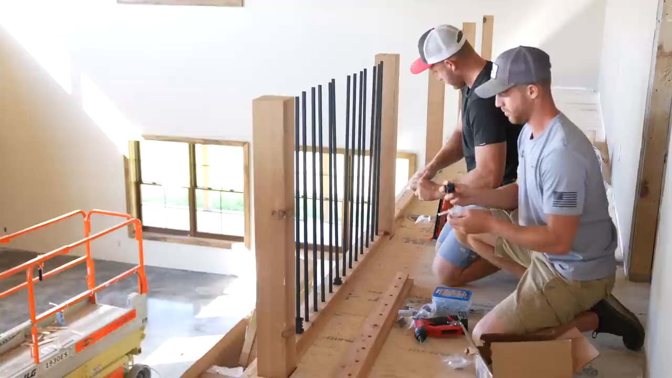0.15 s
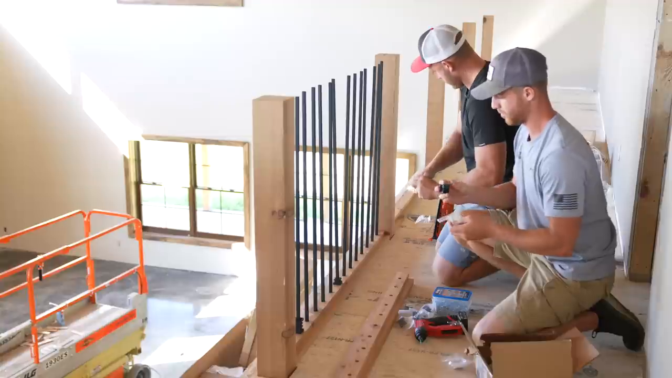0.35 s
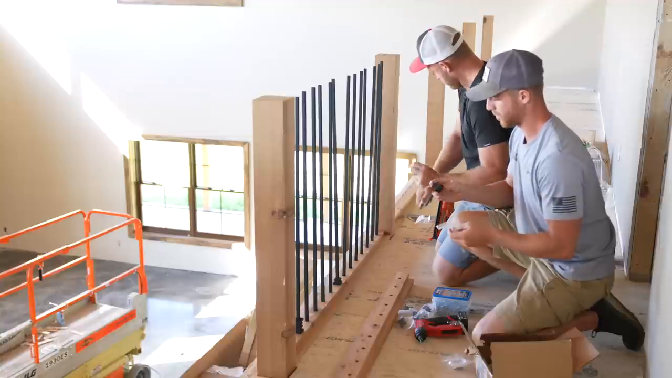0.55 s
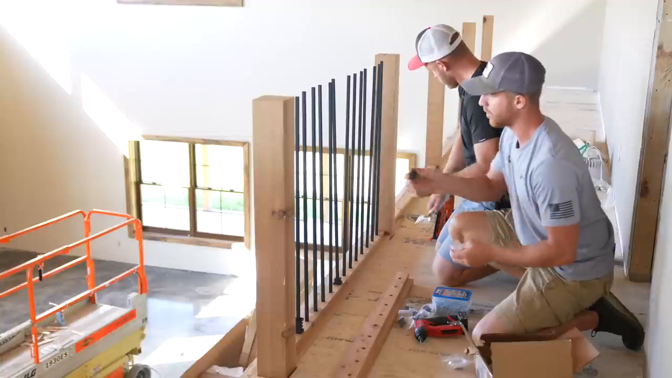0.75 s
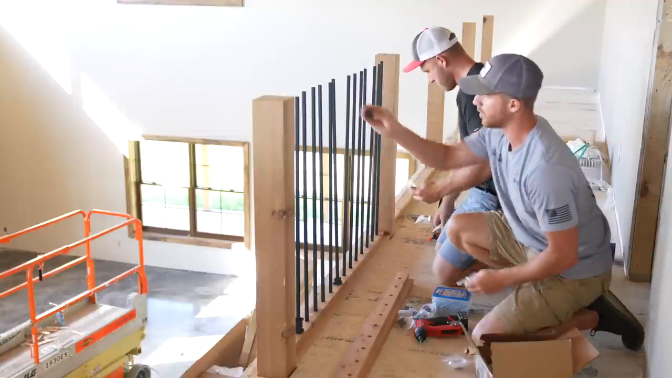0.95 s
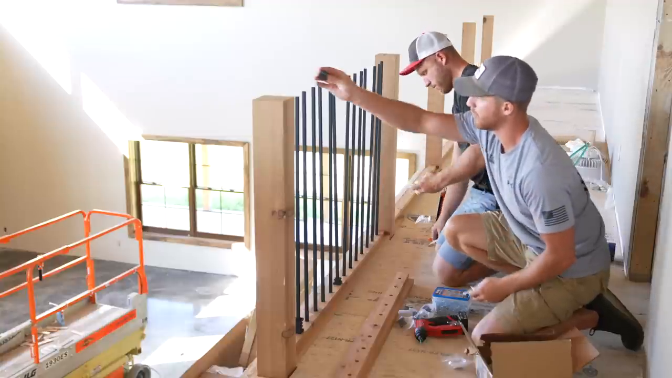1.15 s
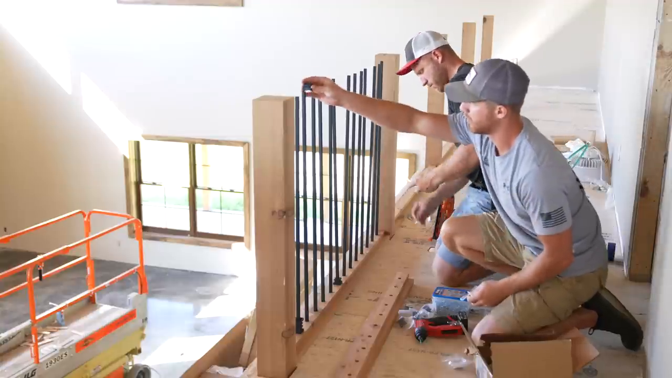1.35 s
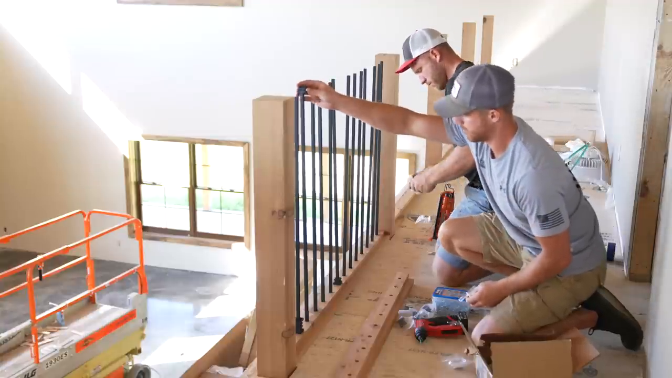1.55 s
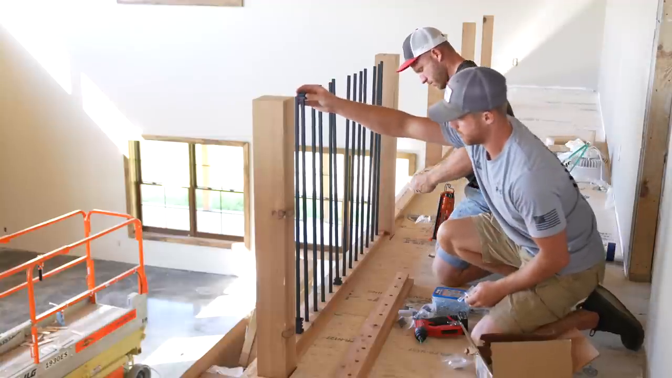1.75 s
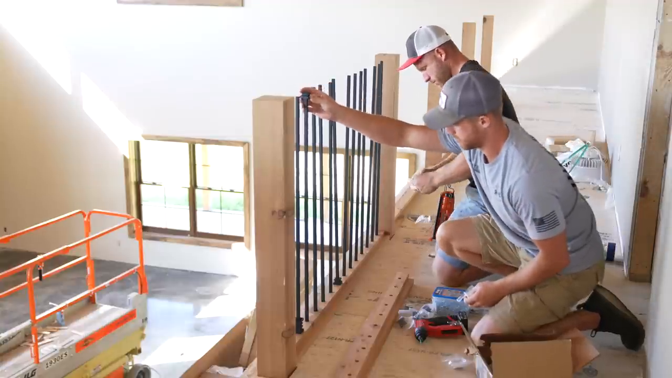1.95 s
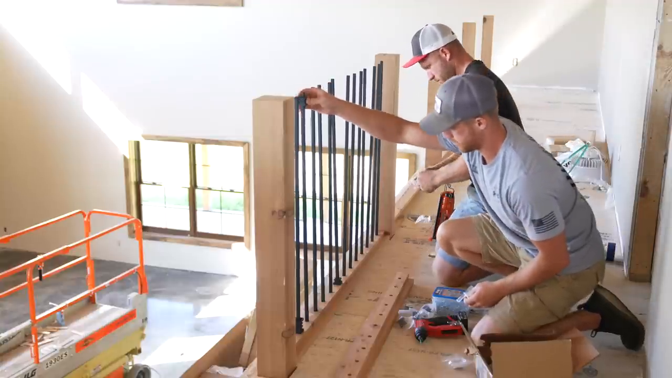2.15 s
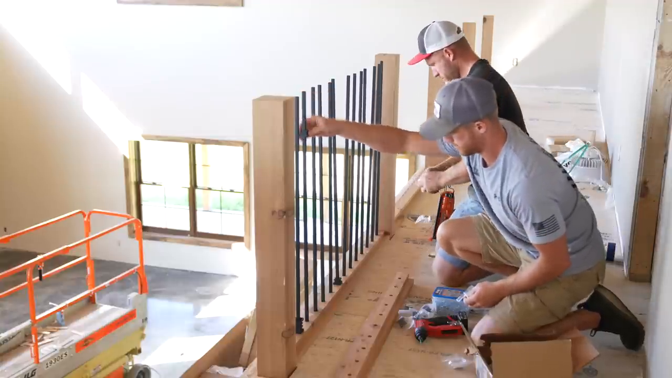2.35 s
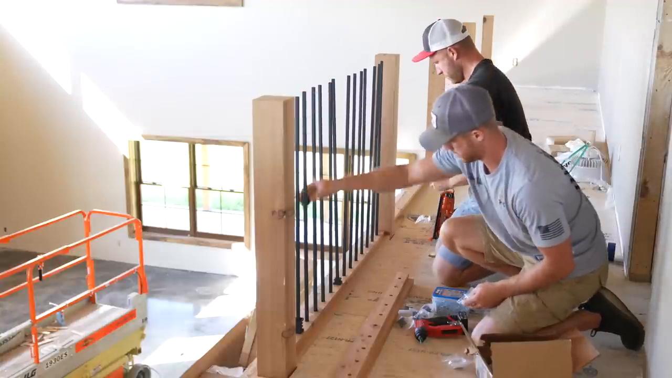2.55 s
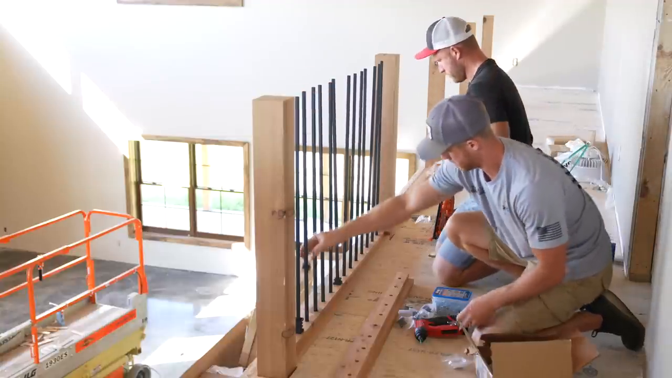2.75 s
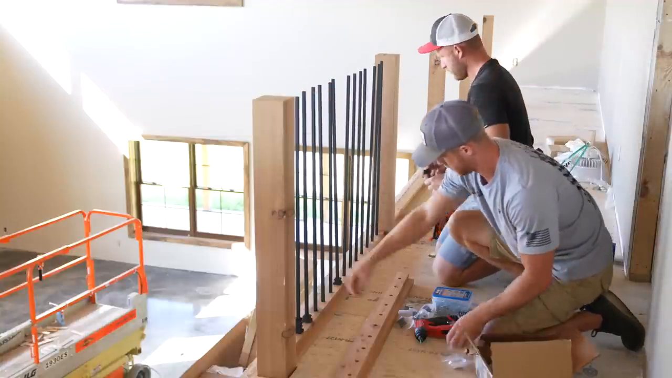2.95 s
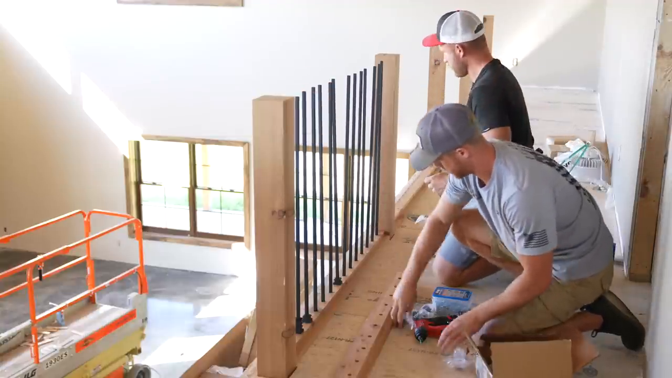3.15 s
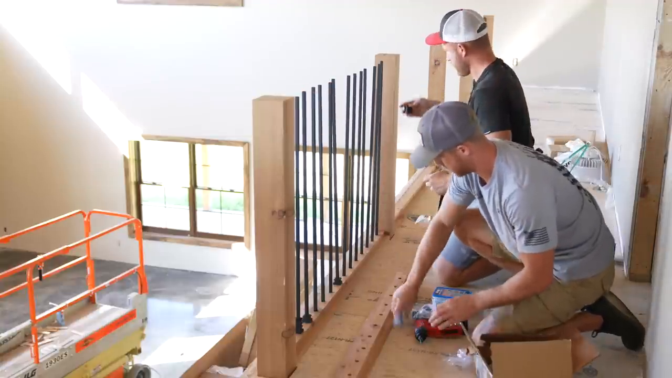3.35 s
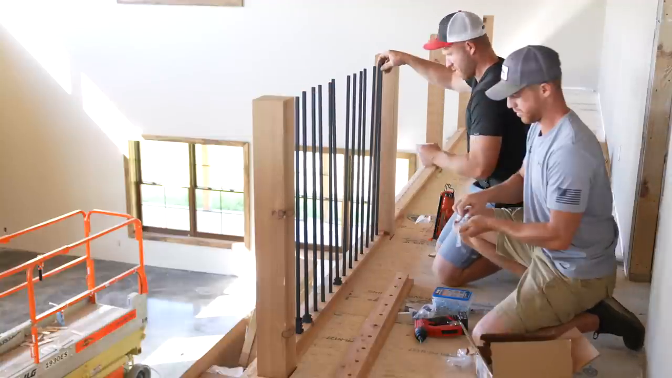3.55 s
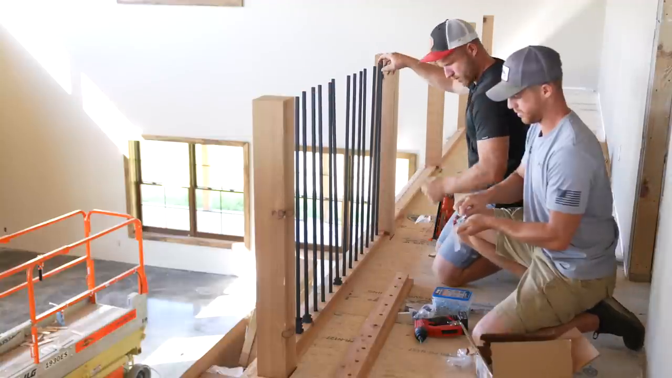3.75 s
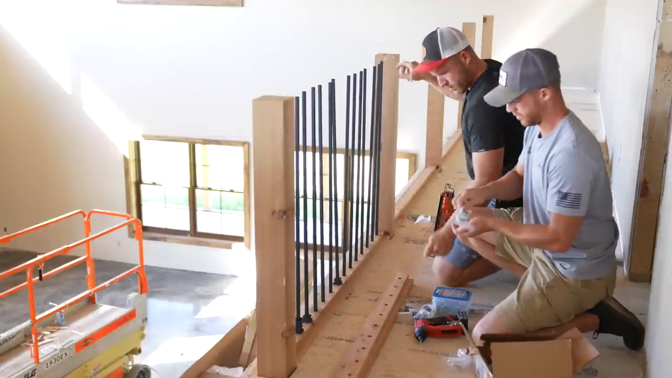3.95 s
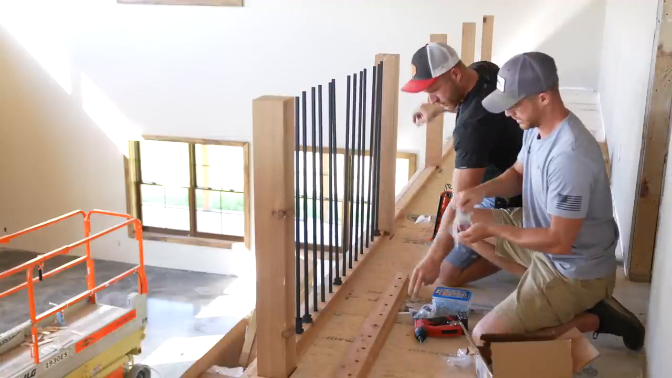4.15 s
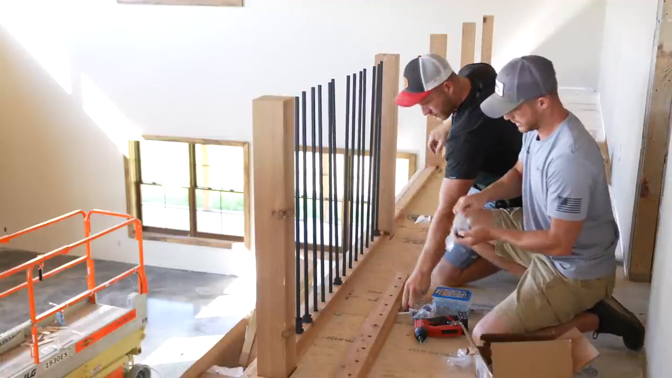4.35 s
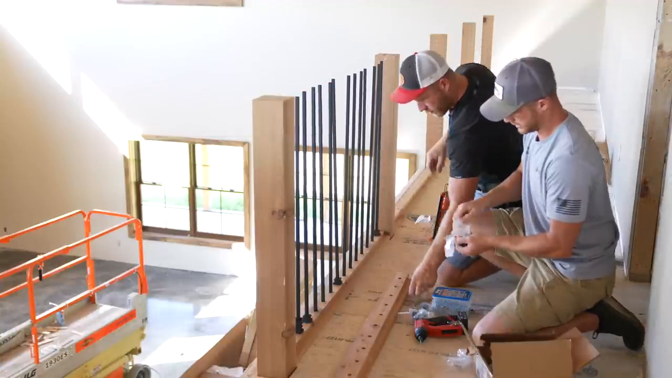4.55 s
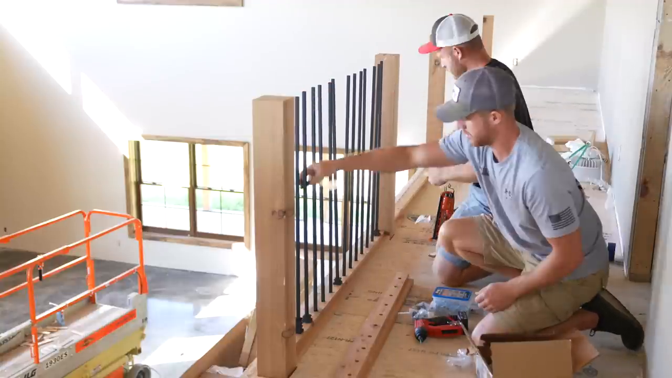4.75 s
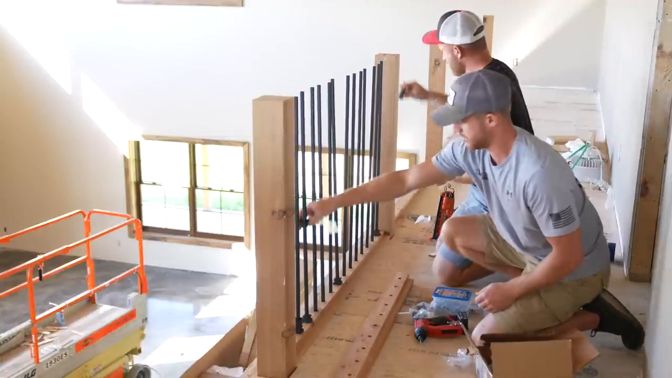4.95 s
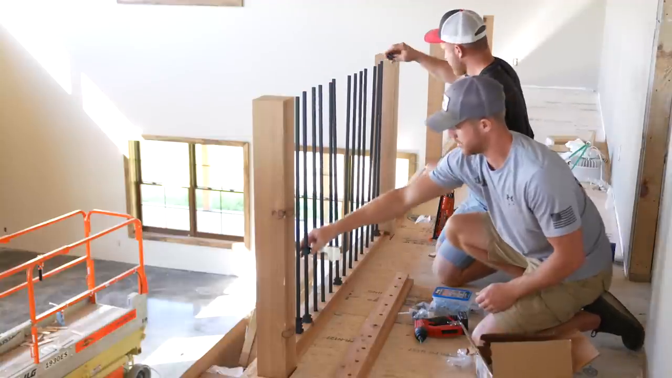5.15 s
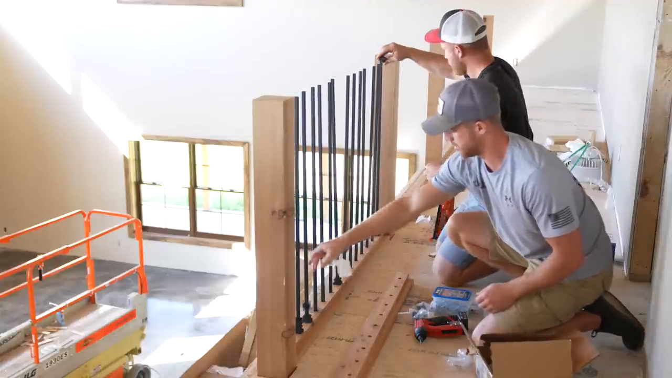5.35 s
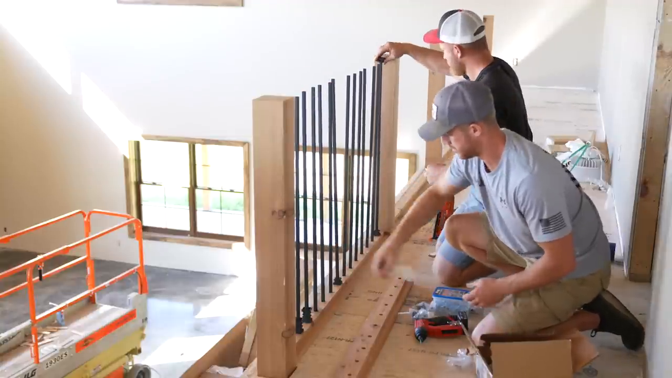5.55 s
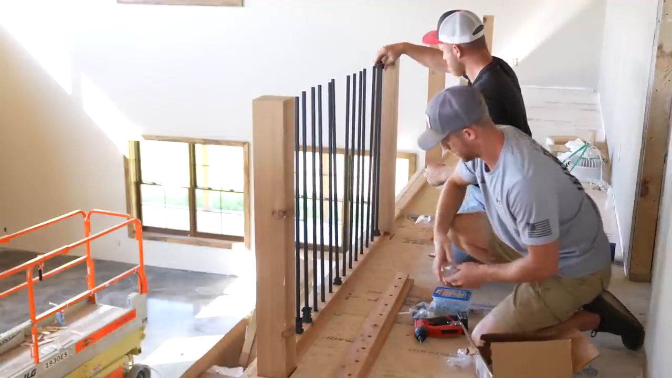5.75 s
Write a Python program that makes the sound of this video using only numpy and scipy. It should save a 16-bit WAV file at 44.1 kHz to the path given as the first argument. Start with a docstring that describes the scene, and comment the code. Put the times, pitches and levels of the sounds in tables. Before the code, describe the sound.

Small iron fittings click together in the hand and land on the wooden base of a stair railing with five sharp clanks. The first two are lighter; the last three rattle and leave the bars ringing briefly. Before the third and the fifth, a fitting scrapes down a bar with a thin squeal. Dull wood knocks and faint clothing rustle come in between, and the bare room echoes over quiet air.

```python
"""Four iron shoes land on a wooden base board, each with a clank, a short rattle and a ringing spindle; once, a
dull knock on wood comes with a metal click. Two fitters are seating them on a stair railing in a bare,
unfinished house. Friction drives a spindle's bending modes as a shoe scrapes down it, and now and then locks
into a squeal. Loose shoes click in the hand, wood knocks, clothes rustle and the empty hall echoes over still
air. Once, after the second clank, the ring and echo drop away abruptly."""
import sys
import numpy as np
from scipy import signal
from scipy.fft import rfft, irfft
from scipy.io import wavfile
from scipy.ndimage import uniform_filter1d

SR = 44100
rng = np.random.default_rng(int(sys.argv[2]) if len(sys.argv) > 2 else 0)


def persist_wave(psi):
    """Save psi, clipped to +-1, as 16-bit WAV."""
    counts = np.round(np.clip(psi, -1, 1) * 32767).astype(np.int16)
    wavfile.write(sys.argv[1], SR, np.atleast_2d(counts).T)


N = 255339
TIME = np.arange(N) / SR
AGE = TIME[:SR]  # the first second of a hit

# Iron blows: four shoe landings and, in the second row, the metal click that goes with a dull knock # on wood
# at 1.32 s. Each row: start in seconds, level in dB, crack, rattle and rebound in dB against # the first
# contact, board thud level in dB, spindle ring level in dB, hall send in dB.
IRON_BLOWS = [(0.5097, -26.5, -6.5, -12, -6.5, -76, -56, -16.5),
              (1.3246, -26.5, 11, -5.5, -42, -58, -58, -10), (2.9304, -19.5, 11.5, 1.5, 0, -52, -34, -6),
              (4.1663, -18, 16.5, 7.5, 8, -56.5, -35.5, -7),
              (5.4474, -22.5, -2, 0.5, -15, -50.5, -37.5, -5.5)]
# The iron colour of each blow, one EQ curve per row of IRON_BLOWS. Each point: frequency in Hz, gain in dB.
SHOE_COLOURS = [
    [(150, -40), (250, -24), (576, -5), (1950, -10.5), (2280, -3.5), (2960, -5), (4120, -12), (5350, -5.5),
     (10200, -14), (11900, -22), (14900, -16), (16000, -10)],
    [(150, -39), (250, -27), (662, -10), (1060, -13), (2620, 2), (4340, -10.5), (4820, -7.5), (5730, -20),
     (6820, -6), (8850, -18.5), (13400, -15), (16000, -13.5)],
    [(150, -51), (250, -25), (651, -29.5), (922, -10.5), (1060, -31.5), (1180, -14), (1380, -10.5),
     (2240, -5), (3170, -0.5), (6000, -5.5), (7570, -14), (9660, -17.5), (11300, -22.5), (16000, -20.5)],
    [(150, -66.5), (250, -21.5), (452, -9.5), (576, -25), (820, -9), (1280, -22), (1400, -9.5), (1880, -15),
     (3300, -5), (4820, -9), (5800, -7.5), (7700, -18), (15200, -22.5), (16000, -31)],
    [(150, -65), (250, -26), (393, -15.5), (547, -29), (1020, -24), (1200, -22), (2020, -5.5), (4570, -5.5),
     (6700, -11.5), (7700, -9), (10300, -10.5), (12000, -18.5), (16000, -18)],
]
# Pings and held notes, one list per blow. Each row: pitch in Hz, level in dB, T60 in seconds.
SHOE_TONES = [
    [(2965, -41, 0.035)],
    [(7170, -56, 0.075)],
    [(2328, -32, 0.22), (2940, -38.5, 0.55), (3350, -24, 0.011), (3220, -38.5, 0.48), (9700, -41, .25),
     (819, -53, 1.4)],
    [(3660, -29.5, 0.18), (6190, -26.5, 0.025), (9560, -41, 0.45), (9440, -44, 0.44), (9970, -42.5, .3),
     (820, -45.5, 0.89)],
    [(2755, -37.5, 0.043), (820.6, -58, 1), (7530, -32.5, 0.18), (9700, -24, 0.0014)],
]
# The base board's colour, which throws the clank into the hall. Each row: frequency in Hz, gain in dB.
BOARD_COLOUR = [(100, -1), (350, -12.5), (800, -5.5), (1100, -11.5), (1700, -2), (3000, -4), (4500, -0.5),
                (7000, -16), (15000, -14)]
# The board's low thud. Each row: mode frequency in Hz, gain in dB, T60 in seconds.
BOARD_MODES = [(54, -19, 0.1), (84.5, -8.5, 0.38), (140, -8.5, 0.051), (415, 3.5, 0.074)]

def clanks(crack_t60=0.033, rattle_t60=0.081, rebound_s=.013,
           board_db=-14, board_room_db=-8, tone_room_db=-1.5):
    """Each iron blow (a shoe landing, or the metal click of a knock) rebounds and rattles; the board thuds and
    the spindle rings on."""
    thud = ring(BOARD_MODES) * (1 - fade(0.024))  # the heavy board takes a moment to get moving
    held = 1 - fade(0.03)  # lasting tones fill the hall more than brief pings
    grid_hz = np.geomspace(100, 16000, 80)
    for shoe, tones, landing in zip(SHOE_COLOURS, SHOE_TONES, IRON_BLOWS):
        start, db, crack_db, rattle_db, rebound_db, thud_db, ring_db, room_db = landing
        rebound = undb(rebound_db) * np.roll(rattle(crack_t60), int(rebound_s * SR))
        push = contact(crack_db, crack_t60) + undb(rattle_db) * rattle(rattle_t60) + rebound
        iron = burst(colour(push, shoe), db)
        tone = sum(burst(ring([(hz, 0, t60)]), tone_db) for hz, tone_db, t60 in tones)
        board = burst(colour(rattle(0.063), BOARD_COLOUR), db + board_db)
        spindle = burst(spindle_ring(), ring_db)
        # shoe and board add their power in the hall
        shoe_power = undb(along(grid_hz, shoe)) ** 2
        board_power = undb(along(grid_hz, BOARD_COLOUR) + board_room_db) ** 2
        send = radiate(np.c_[grid_hz, 10 * np.log10(shoe_power + board_power)], db + room_db)
        send += (tone * held + spindle) * undb(room_db + tone_room_db)
        yield start, iron + tone + board + burst(thud, thud_db) + spindle, send

# The singing spindle's bending modes. Each row: frequency in Hz, gain in dB, T60 in seconds.
SPINDLE_MODES = [(496, -2, 0.59), (818, -7.5, 1.6), (1243, -6, 0.56), (1584, -4.5, 1), (1741, -1.5, 1.1),
                 (2374, 3, 0.44), (2724, -1, 0.54), (3013, 2.5, 0.62), (3660, -1.5, 1.6), (4530, -4.5, .65),
                 (5324, -5.5, 0.66), (6220, -8.5, 0.63), (7070, -14.5, .45), (9620, -21, .4),
                 (10070, -15, 0.56), (14300, -9.5, .25)]

def spindle_ring(spread_db=2.5, detune=.005, chatter_db=3, chatters_per_s=70):
    """A square spindle bends in two planes, so its modes beat in pairs; the loose shoe roughens them."""
    chance = rng.standard_normal((2 * len(SPINDLE_MODES), 2))
    sound = 0
    for (hz, db, t60), (louder, sharper) in zip(2 * list(SPINDLE_MODES), chance):
        mode = ring([(hz * (1 + detune * sharper), db + spread_db * louder, t60)])
        sound += mode * flutter(chatter_db, chatters_per_s)[:SR]
    return sound

# Little hops after a landing. Each row: start in seconds, level in dB.
HOPS = [(0.5334, -48.5), (2.977, -38.5), (4.216, -35), (4.232, -53), (5.458, -36), (5.492, -37.5)]

def bounces(clatter_db=12, clatter_t60=0.023, room_db=-12):
    """A landed shoe hops and settles with a softer chatter of its own colour."""
    for start, db in HOPS:
        last_landed = sum(landing[0] < start for landing in IRON_BLOWS) - 1
        sound = burst(colour(contact(clatter_db, clatter_t60), SHOE_COLOURS[last_landed]), db)
        yield start, sound, sound * undb(room_db)

# Scrapes along a spindle. Each row: start and stop in seconds, grip time in seconds, scrape level in dB,
# drop in dB as the shoe slows, high hiss level in dB, grit level in dB.
SCRAPES = [(2.17, 2.353, 0.034, -57.5, 2, -76, -77), (2.349, 2.925, 0.047, -44.5, 10.5, -62, -57),
           (4.789, 5.287, 0.0052, -50, 7, -60, -59), (5.379, 5.43, .015, -55.5, 1.5, -68, -62)]

def slide(loaded_hz=110, free_hz=45, loaded_db=-3, free_db=-9, rub_db=-7, flutter_db=2.5):
    """Fine slips drive the spindle; the shoe broadens its modes, favours them by turns and hisses."""
    slips = rng.standard_normal(N) * flutter(0.98, 70)
    scrape_gain = hiss_gain = grit_gain = 0
    for start, stop, grip_s, scrape_db, slowing_db, hiss_db, grit_db in SCRAPES:
        speed = stroke(start, stop, grip_s, slowing_db)
        scrape_gain += undb(scrape_db) * speed
        hiss_gain += undb(hiss_db) * speed ** 1.5  # hiss follows the speed more steeply
        grit_gain += undb(grit_db) * speed
    loaded = sum(undb(db) * flutter(flutter_db) * band(slips, hz, loaded_hz + hz / 40)
                 for hz, db, _ in SPINDLE_MODES)
    free = sum(undb(db) * flutter(flutter_db) * band(slips, hz, free_hz) for hz, db, _ in SPINDLE_MODES)
    rub = colour(slips, [(100, -17), (400, 22), (2900, 22), (4000, 0), (8000, -35.5)])
    scrape = steady(loaded) * undb(loaded_db) + steady(free) * undb(free_db) + steady(rub) * undb(rub_db)
    sizzle = signal.sosfilt(signal.butter(3, [14200, 15600], "band", fs=SR, output="sos"), slips)
    grain = flutter(4.5, 450)
    hiss = steady(sizzle * flutter(flutter_db) * grain)
    return scrape_gain * scrape + hiss_gain * hiss + grit_gain * steady(slips * grain)

def stroke(start, stop, grip_s, slowing_db, fastest_share=0.39, release_t60=0.54):
    """Envelope of one scrape: the shoe grips, speeds up, slows and lets the spindle ring out."""
    fastest = start + fastest_share * (stop - start)
    off_peak = (np.clip(TIME, start, stop) - fastest) / (stop - fastest)
    grip = np.clip((TIME - start) / grip_s, 0, 1)
    release = fade(release_t60, np.maximum(TIME - stop, 0))
    return grip * undb(-slowing_db * off_peak ** 2) * release

# Thin friction squeals. Each row: crest time in seconds, swell in seconds, pitch in Hz, level in dB.
SQUEALS = [(2.55, 0.077, 3760, -65), (2.58, 0.046, 14300, -58), (2.62, 0.21, 9380, -64),
           (2.77, 0.04, 3690, -53.5), (4.05, 0.19, 9800, -69.5), (4.89, 0.11, 3750, -56),
           (4.97, .18, 9350, -66), (5.13, 0.18, 3745, -57.5)]

def squeals(width_hz=55, width_share=0.004):
    """Now and then the friction locks on to one mode, which swells and fades."""
    sound = 0
    for crest, swell_s, hz, db in SQUEALS:
        swell = np.exp(-((TIME - crest) / swell_s) ** 2 / 2)
        whistle = band(rng.standard_normal(N), hz, width_hz + width_share * hz)
        sound += undb(db) * swell * steady(whistle)
    return sound

# Bright handling clicks. Each row: start in seconds, peak in dB before click()'s lift, pitch in Hz,
# treble in dB before the same lift, clatter in dB against the first contact.
HANDLING_CLICKS = [(0.0673, -32, 3040, -10.5, -6.5), (0.14, -32.5, 2820, -13, -2),
                   (0.1487, -23, 2520, -12, -11), (0.1684, -23, 1720, -12, 2), (0.1759, -22, 2820, -5.5, 0),
                   (0.2059, -31.5, 1240, -7, 4.5), (0.2603, -30.5, 2730, -10, 4),
                   (0.265, -27, 1710, -4, -5), (0.3193, -31, 5330, 17, 12), (0.3368, -31, 2980, 4, 4),
                   (0.389, -37.5, 4600, -15, 4), (0.432, -33.5, 2580, -8, 3),
                   (0.4555, -28.5, 2920, -19.5, 2), (0.8496, -20.5, 2960, 1, 4), (1.147, -35, 2350, 0, 6.5),
                   (1.1752, -43, 2426, -40, 7), (1.238, -38.5, 2710, -7, 7), (1.274, -40, 2350, -37, -4),
                   (1.3497, -29.5, 5600, 4, 9), (1.367, -29.5, 4600, 1.5, 3.5),
                   (1.6683, -22, 2750, -7, -11.5), (1.696, -25.5, 1700, -7.5, 4),
                   (1.7971, -25, 2520, -7.5, -4), (1.8256, -26.5, 1810, 4, 2.5),
                   (1.8779, -24.5, 2440, -18, -1.5), (1.93, -39, 2300, -24.5, -4),
                   (2.019, -23.5, 2570, -10, -2), (2.153, -35, 2470, -16, -2),
                   (2.2417, -29, 2380, -16.5, -9.5), (2.27, -31.5, 1740, -11.5, -11),
                   (2.321, -37, 1810, -17.5, -5), (2.3362, -32, 3080, -32.5, -7),
                   (2.3506, -21.5, 3000, -4.5, 0.5), (2.657, -30.5, 2676, -14.5, 2),
                   (2.7096, -21, 1780, 0.5, -5.5), (2.8408, -30.5, 1230, 1.5, -2.5),
                   (3.8393, -33, 2970, -2, 1), (3.904, -32, 2620, 1, -9), (4.0105, -39, 1480, -6, 10.5),
                   (4.051, -38, 4540, 9, 1.5)]

def clicks(room_db=-16):
    """Shoes knock together as they are picked up and turned in the hand."""
    for start, db, hz, treble_db, clatter_db in HANDLING_CLICKS:
        sound = click(db, hz, treble_db, clatter_db)
        yield start, sound, sound * undb(room_db)

def click(db, hz, treble_db, clatter_db, body_db=-8, hollow_db=-12, ring_db=-1, width_hz=230, lift_db=5):
    """Two small iron parts touch: a hand-damped ring, a hollow body and a bright edge."""
    push = contact(clatter_db, 0.017)[:SR // 8]
    edge = colour(push, [(100, -23.5), (600, -15.5), (2000, -1), (7000, -2), (12000, -9.5),
                         (16000, -4.5)])
    partials = resonate(push, hz, width_hz) + resonate(push, 1.9 * hz, width_hz)
    damped_ring = band(push, hz, 0.64 * hz) + undb(ring_db) * partials
    body = undb(body_db) * resonate(push, 1300, 670) + undb(hollow_db) * band(push, 640, 890)
    sound = damped_ring + undb(treble_db + lift_db) * edge + body
    return undb(db + lift_db) * sound / np.abs(sound).max()

# Dull knocks on wood. Each row: start in seconds, level in dB, hall send in dB.
WOOD_KNOCKS = [(.03, -52, -1), (1.324, -36, -7), (1.3288, -29, 1), (2.022, -44, -8), (4.593, -46, -10),
               (4.612, -42.5, -7), (4.628, -44.5, -6), (4.679, -46.5, -15), (5.37, -55.5, -2.5)]
# The body of the timber. Each row: frequency in Hz, gain in dB.
WOOD_COLOUR = [(60, -42), (160, -10.5), (350, -2), (1000, 1.5), (1500, 2), (2200, -12), (4000, -19),
               (12000, -30)]

def knocks(scuff_db=4, scuff_t60=0.056):
    """Scuffing blows on timber, which fill the hall."""
    for start, db, room_db in WOOD_KNOCKS:
        sound = burst(colour(contact(scuff_db, scuff_t60), WOOD_COLOUR), db)
        yield start, sound, radiate(WOOD_COLOUR, db + room_db)

# A shoe brushes its spindle. Each row: start in seconds, level in dB.
SPINDLE_TAPS = [(1.566, -37), (1.744, -45), (2.054, -42.5), (2.38, -53), (4.79, -52.5)]
# The choked ring of a hand-held spindle. Each row: frequency in Hz, gain in dB, T60 in seconds.
HELD_MODES = [(2400, 0.5, 0.11), (3200, 5.5, 0.058), (4565, -10.5, 0.17), (5320, -1, 0.053),
              (7000, -10.5, .12)]

def taps(room_db=-11, scratch_db=6, scratch_t60=0.1, detune=0.028, dull_db=-4):
    """Scratchy touches on a spindle that the hand soon damps; each grip shifts the ring a little."""
    for start, db in SPINDLE_TAPS:
        push = contact(scratch_db, scratch_t60)
        modes = [(hz * (1 + detune * rng.standard_normal()), gain, t60) for hz, gain, t60 in HELD_MODES]
        ringing = unit(signal.fftconvolve(push, ring(modes))[:SR])
        dull = undb(dull_db) * unit(band(push, 3000, 3000))
        sound = burst(resonate(ringing + dull, 4000, 5000), db)
        yield start, sound, sound * undb(room_db)

# Spells of faint ticking. Each row: start and stop in seconds, typical peak in dB before click()'s lift.
FIDGET_SPELLS = [(0.121, 0.471, -43), (0.718, 1.312, -52), (1.349, 2.05, -41.5), (2.119, 2.901, -47),
                 (3.831, 4.057, -46)]

def fidgets(per_s=50, spread_db=5, clatter_db=0, body_db=-6, room_db=-12):
    """Loose parts tick at random in the hand and on the spindle."""
    for start, stop, db in FIDGET_SPELLS:
        count = int(per_s * (stop - start))
        for when, size, pitch, edge in rng.uniform(-1, 1, (count, 4)):
            sound = click(db + spread_db * size, 2900 * 1.5 ** pitch, -11 + 11 * edge, clatter_db, body_db)
            yield start + (stop - start) * (when + 1) / 2, sound, sound * undb(room_db)

# Hand and cloth moves. Each row: start and stop in seconds, level in dB.
CLOTH_MOVES = [(0.117, 0.477, -64.5), (1.34, 1.733, -53.5), (3.824, 4.16, -62.5), (4.28, 4.72, -59)]
# Their papery colour. Each row: frequency in Hz, gain in dB.
CLOTH_COLOUR = [(150, -22), (600, 0.5), (2500, 7), (6000, -2), (15000, -12)]

def rustle(grain_db=4, grains_per_s=400, swell_db=4, swells_per_s=35):
    """Skin and cloth rub in uneven little surges."""
    level = sum(undb(db) * ((TIME > start) & (TIME < stop)) for start, stop, db in CLOTH_MOVES)
    grains = rng.standard_normal(N) * flutter(grain_db, grains_per_s) * flutter(swell_db, swells_per_s)
    return uniform_filter1d(level, size=2600) * steady(colour(grains, CLOTH_COLOUR))

# A last shimmer of iron. Each row: frequency in Hz, level in dB, T60 in seconds.
LINGERING_MODES = [(3000, -68.5, 1), (4520, -74, 0.77), (9600, -61, 0.12)]

def after_ring():
    """The spindle still rings faintly once the echo has dropped away."""
    return ring(LINGERING_MODES)

# The length of the hall's tail. Each row: frequency in Hz, T60 in seconds.
HALL_DECAY = [(150, 1.46), (400, 2), (1000, 2), (2800, 1.58), (5000, 1.22), (8000, 0.97), (15000, 0.54)]
# The tone of that tail. Each row: frequency in Hz, gain in dB.
HALL_COLOUR = [(60, -22.5), (200, -2), (500, -0.5), (1200, 1.5), (3000, -0.5), (6000, -3), (10000, -3),
               (16000, -1)]

def hall(build_s=0.0029):
    """Diffuse echo of bare walls: it builds up quickly and loses its treble first."""
    t = TIME[:2 * SR]
    spectrum = rfft(rng.standard_normal(len(t)))
    hz = np.linspace(0, SR / 2, SR + 1)
    centres, t60s = np.transpose(HALL_DECAY)
    tail = sum(irfft(spectrum * along(hz, np.c_[centres, share])) * fade(t60, t)
               for share, t60 in zip(np.eye(len(centres)), t60s))
    build = 1 - np.exp(-t / build_s)
    return colour(tail * build, HALL_COLOUR) / np.sqrt(np.sum(fade(0.96, t) ** 2))

# Room tone. Each row: frequency in Hz, gain in dB.
AIR_COLOUR = [(30, -36.5), (60, -19), (200, -5), (420, -8), (900, -9.5), (2500, -14.5), (6000, -28.5),
              (16000, -31.5)]

def air(level_db=-63):
    """The still air of the house: a soft, dark bed of noise."""
    return undb(level_db) * steady(colour(rng.standard_normal(N), AIR_COLOUR))

def contact(rattle_db, t60):
    """A hard first contact, then a dying rattle of small ones."""
    push = undb(rattle_db) * rattle(t60, grit=0.53)
    push[0] += 1
    return push

def rattle(t60, grit=.5):
    """Dense uneven contacts that die away; unit energy."""
    noise = rng.standard_normal(SR)
    roughness = np.exp(grit * np.repeat(rng.standard_normal(SR), 32)[:SR])
    return unit(noise * roughness * fade(t60))

def ring(modes):
    """Free ring of (Hz, dB, T60 in seconds) modes."""
    return sum(undb(db) * fade(t60) * np.sin(2 * np.pi * hz * AGE) for hz, db, t60 in modes)

def radiate(points, db):
    """A blow's hall send: summed over all directions, only its broad colour is left."""
    return burst(colour(signal.unit_impulse(SR), points), db)

def flutter(depth_db, per_s=22):
    """A gain that wanders at random."""
    hold = int(SR / per_s)
    steps = np.repeat(rng.standard_normal(N // hold + 1), hold)[:N]
    return undb(depth_db * uniform_filter1d(steps, hold))

def resonate(x, hz, width_hz):
    """One resonance, gain 1 at its centre."""
    hz = min(hz, .45 * SR)
    return signal.lfilter(*signal.iirpeak(hz, hz / min(width_hz, SR / 4), SR), x + 1e-18)

def band(x, hz, width_hz):
    """A resonance with steep skirts."""
    return resonate(resonate(x, hz, width_hz), hz, width_hz)

def colour(x, points, size=4096):
    """Minimum-phase EQ through (Hz, dB) points."""
    gain = undb(along(np.linspace(0, SR / 2, size // 2 + 1), points))
    cepstrum = irfft(np.log(gain))
    cepstrum[1:size // 2] *= 2
    cepstrum[size // 2 + 1:] = 0
    return signal.fftconvolve(x, irfft(np.exp(rfft(cepstrum))))[:len(x)]

def along(hz, points):
    """Read (Hz, value) points on a log-frequency axis."""
    points_hz, values = np.transpose(points)
    return np.interp(np.log(np.maximum(hz, 1)), np.log(points_hz), values)

def undb(db):
    """Decibels to gain."""
    return 10 ** (np.asarray(db) / 20)

def fade(t60, t=AGE):
    """Decay by 60 dB every t60 seconds."""
    return np.exp(-np.log(1000) * t / t60)

def unit(x):
    """Scale to unit energy."""
    return x / np.sqrt(np.sum(x ** 2))

def steady(x):
    """Scale to unit rms."""
    return x / np.std(x)

def burst(x, db):
    """Set the rms level of the first 30 ms."""
    return x * undb(db) / np.sqrt(np.mean(x[:int(.03 * SR)] ** 2))

def add(track, start, x):
    """Mix x into the track from start, in seconds."""
    i = max(int(start * SR), 0)
    track[i:i + len(x)] += x[:max(N - i, 0)]

def scene(hush_s=3.456, hush_db=-22, hush_ramp_s=0.0024):
    """Hits and their echo over scrapes, cloth and air; the early hits' tails duck abruptly at hush_s."""
    echo = hall()
    direct, sends = np.zeros((2, N)), np.zeros((2, N))
    for source in (clanks, bounces, knocks, clicks, taps, fidgets):
        for start, sound, send in source():
            bus = int(start > hush_s - .1)  # 0 for early hits, 1 for late ones
            add(direct[bus], start, sound)
            add(sends[bus], start, send)
    add(direct[1], hush_s, after_ring())
    early, late = (sound + signal.fftconvolve(send, echo)[:N] for sound, send in zip(direct, sends))
    hush = undb(hush_db * np.clip((TIME - hush_s) / hush_ramp_s, 0, 1))
    return (early * hush + late + air() + slide() + squeals() + rustle())[None]

def record(dry, low_hz=38, top_hz=15900):
    """Master chain: clip the hardest peaks, then cut the deepest bass and the very top."""
    clipped = np.clip(dry, -.8, .8)
    lean = signal.sosfilt(signal.butter(2, low_hz, "high", fs=SR, output="sos"), clipped)
    return signal.sosfilt(signal.ellip(10, .2, 80, top_hz, fs=SR, output="sos"), lean)

dry = scene()
out = record(dry)
persist_wave(out)
```